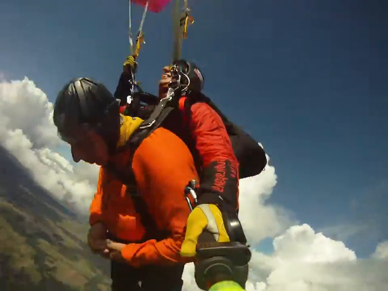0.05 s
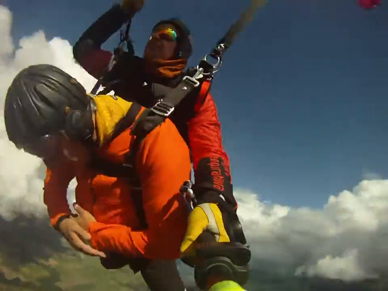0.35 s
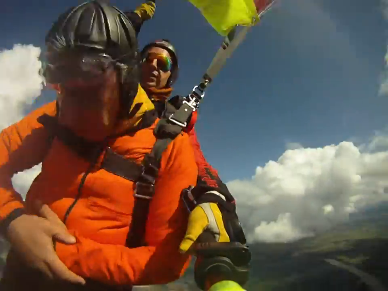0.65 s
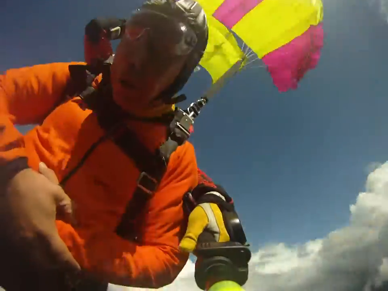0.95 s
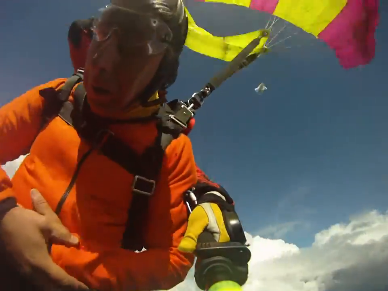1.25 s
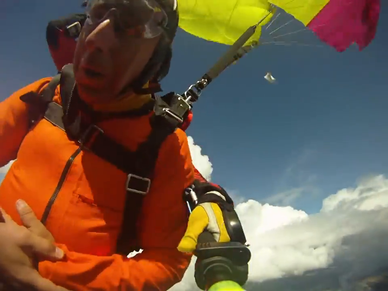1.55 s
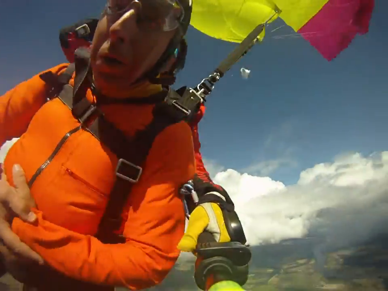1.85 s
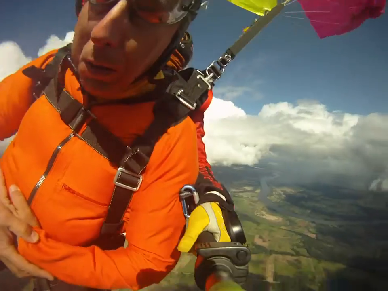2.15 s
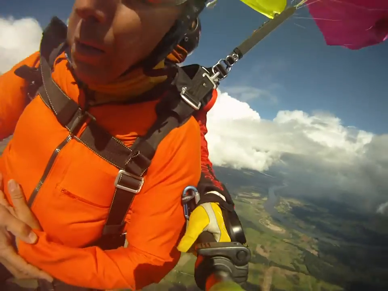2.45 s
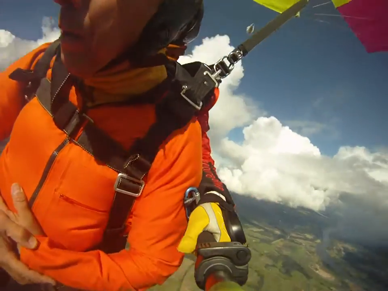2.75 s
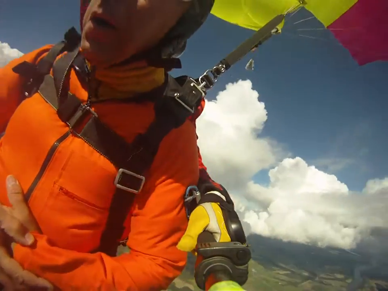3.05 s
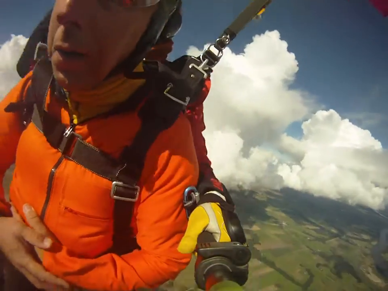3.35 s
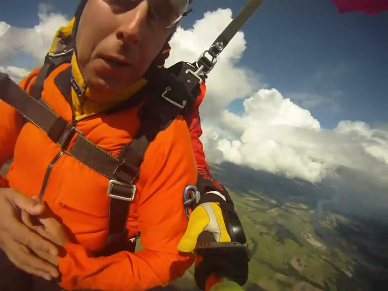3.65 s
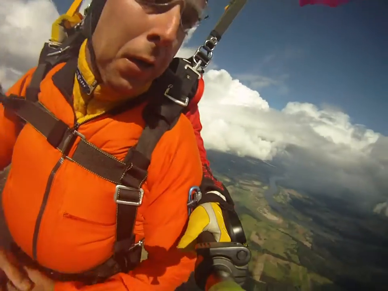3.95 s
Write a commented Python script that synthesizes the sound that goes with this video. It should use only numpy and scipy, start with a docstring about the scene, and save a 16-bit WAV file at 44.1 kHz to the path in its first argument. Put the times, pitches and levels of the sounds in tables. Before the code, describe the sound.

Strong wind rushes and buffets a wrist-worn microphone high in the air. A parachute canopy flutters and cracks as it fills, then settles, and the rush eases to a softer flow with a low, wavering hum.

```python
"""Parachute opening, heard from the wrist

A small camera rides in a closed housing on the jumper's wrist. The canopy flutters and cracks
as it fills, then settles while the air rush slows. Turbulence buffets the housing, which booms
at one low resonance, whistles at an edge and colours the rush. Lines chirp and straps rub.
The camera's 12 kHz sample-and-hold adds a gritty treble."""
import sys
import numpy as np
from scipy import signal
from scipy.fft import rfft, irfft
from scipy.io import wavfile

SR = 44100
rng = np.random.default_rng(int(sys.argv[2]) if len(sys.argv) > 2 else 0)


def file_out(sig):
    """Save sig as 16-bit WAV at sys.argv[1]."""
    # one column per channel
    cols = np.atleast_2d(sig).T
    # limit, then scale
    lim = np.clip(cols, -1, 1)
    pcm = np.round(lim * 32767).astype(np.int16)
    wavfile.write(sys.argv[1], SR, pcm)


N = 176400
TIME_S = np.arange(N) / SR
BINS_HZ = np.arange(N // 2 + 1) * SR / N


def from_db(db):
    """Decibels to gain."""
    return 10 ** (np.asarray(db) / 20)


def unit_rms(x):
    """Scale to unit power."""
    return x / np.sqrt(np.mean(x ** 2) + 1e-20)


def gain_curve(points):
    """Gain per sample from rows of t/s, level/dB."""
    return from_db(np.interp(TIME_S, *np.transpose(points)))


def coloured(x, spectrum, rolloff_db_per_oct=36):
    """Filter by rows of f/Hz, level/dB, rolling off above the last; unit power."""
    hz, db = np.transpose(spectrum)
    octaves = np.log2(np.maximum(BINS_HZ, 1))
    octaves_above = np.maximum(octaves - np.log2(hz[-1]), 0)
    shape_db = np.interp(octaves, np.log2(hz), db) - rolloff_db_per_oct * octaves_above
    return unit_rms(irfft(rfft(x) * from_db(shape_db), N))


def noise(spectrum):
    """Coloured noise; unit power."""
    return coloured(rng.standard_normal(N), spectrum)


def resonance(hz, half_width_hz):
    """Noise ringing in one resonance; unit power."""
    detuning = (BINS_HZ - hz) / half_width_hz
    return unit_rms(irfft(rfft(rng.standard_normal(N)) / (1 + detuning ** 2), N))


def drift(rate_hz):
    """Random wander, mostly below rate_hz; unit power."""
    return resonance(0, rate_hz)


def evened(x, share):
    """Flatten a share of the random swells of narrow-band noise; unit power."""
    swell = np.abs(signal.hilbert(unit_rms(x)))
    return unit_rms(x / (swell ** 2 + .1) ** (share / 2))


def bursts(events, attack_s):
    """Summed envelopes: rise, hold until hold_s after onset, fall 60 dB per decay_s."""
    envelope = np.zeros(N)
    for start_s, db, hold_s, decay_s in events:
        age_s = TIME_S - start_s
        rise = np.clip(age_s / attack_s, 0, 1)
        fall = from_db(-60 * np.clip((age_s - hold_s) / decay_s, 0, 10))
        envelope += from_db(db) * rise * fall
    return envelope


def air_rush():
    """Air tears past the housing, heard through its wall resonances; one rings narrowly."""
    # bright part, set by air speed, and hollow lower part: t/s, relative level/dB
    bright_levels = [(0, -15.5), (.05, -27), (.08, -19.5), (.16, -21), (.22, -17), (.245, -22), (.265, -22),
                     (.47, -22), (.52, -23), (.565, -30), (.59, -18.5), (.65, -23.5), (.71, -21.5),
                     (.78, -25), (.86, -28.5), (.92, -22), (1.04, -32.5), (1.08, -29), (1.3, -30.5),
                     (1.37, -34.5), (1.43, -26), (1.55, -29.5), (2.0, -29.5), (2.13, -28.5), (2.2, -31),
                     (2.24, -36), (2.68, -35), (2.8, -32.5), (2.9, -33.5), (3.15, -32), (3.32, -36),
                     (3.75, -38), (3.9, -40.5)]
    hollow_levels = [(0, -25.5), (.24, -24.5), (.27, -30.5), (.48, -27), (.56, -25.5), (.68, -27),
                     (.8, -29.5), (1.05, -33.5), (1.5, -32), (2.1, -34.5), (2.49, -38.5), (2.81, -35),
                     (3.2, -36.5), (3.8, -37.5), (4, -43)]
    # their spectra: f/Hz, level/dB
    bright_spectrum = [(900, -19), (1550, -11), (1850, 0.5), (2070, 1), (2400, -2.5), (2650, -21.5),
                       (2950, -22.5), (3250, -16.5), (4400, -20.5), (5300, -25), (5900, -27.5)]
    hollow_spectrum = [(200, 4.5), (330, -29), (450, -18), (560, -11.5), (700, -3), (880, -5.5), (1110, 3),
                       (1280, -1.5), (1550, -6), (2200, -42)]
    gain_db, flicker_db, ring_db = -1, .7, -10
    eddies = from_db(flicker_db * drift(rate_hz=24))
    wall_ring = from_db(ring_db) * resonance(hz=3640, half_width_hz=135)
    bright = gain_curve(bright_levels) * (noise(bright_spectrum) + wall_ring)
    hollow = gain_curve(hollow_levels) * noise(hollow_spectrum)
    return from_db(gain_db) * eddies * (bright + hollow)


def edge_whistle():
    """Air across a housing edge gives a faint, breathy whistle."""
    # whistle strength: t/s, level/dB
    levels = [(0, -44), (.22, -34.5), (.36, -53), (.71, -36), (.95, -52), (1.65, -49), (2.1, -40.5),
              (2.44, -47), (2.65, -43), (2.98, -43.5), (3.35, -55)]
    # whistle band: f/Hz, level/dB
    spectrum = [(540, -34), (640, 2), (690, -1), (750, 2.5), (810, -10.5), (920, -43)]
    return gain_curve(levels) * evened(noise(spectrum), share=.5)


def housing_boom():
    """Shed eddies drive the housing's low resonance; the stronger the drone, the steadier it locks."""
    # boom strength: t/s, relative level/dB
    levels = [(0.0, -14), (0.03, -26), (0.05, -48), (0.13, -17), (0.18, -29), (0.2, -18), (0.23, -15),
              (0.29, -40), (0.47, -14.5), (0.49, -34), (0.51, -14.5), (0.58, -34), (0.6, -24), (0.72, -25),
              (0.76, -40), (0.95, -25.5), (1.05, -30), (1.17, -24), (1.38, -24.5), (1.43, -34),
              (1.46, -21.5), (1.65, -21.5), (1.69, -35), (1.74, -18), (1.77, -39), (1.82, -17.5),
              (1.87, -30), (1.89, -18), (1.99, -22.5), (2.02, -30), (2.08, -21.5), (2.22, -35), (2.26, -19),
              (2.31, -43), (2.35, -23), (2.48, -22.5), (2.51, -31), (2.8, -24.5), (2.93, -12.5),
              (3.01, -22.5), (3.14, -25), (3.18, -37), (3.25, -31), (3.32, -44), (3.36, -25), (3.58, -23.5),
              (3.63, -18.5), (3.69, -35.5), (3.72, -25.5), (3.81, -37), (3.91, -28.5), (4.0, -39)]
    # rough skirt around the drone: f/Hz, level/dB
    skirt_spectrum = [(60, -64), (88, 11.5), (115, 11.5), (150, 4), (200, -17.5), (260, -11.5),
                      (400, -25.5)]
    boom_hz, wander_hz, flicker_db = 121.3, 8.8, 1.5
    drone_db, octave_db, skirt_db, lock_db = -2, -24, -28, -19
    envelope = gain_curve(levels)
    drive = envelope / from_db(lock_db)
    unsteadiness = 1 / (1 + drive ** 2)
    pitch_hz = boom_hz + wander_hz * unsteadiness * drift(rate_hz=29.6)
    phase = 2 * np.pi * np.cumsum(pitch_hz) / SR
    drone = unit_rms(np.sin(phase) + from_db(octave_db) * np.sin(2 * phase))
    flicker = from_db(flicker_db * unsteadiness * drift(rate_hz=41))
    skirt = from_db(skirt_db) * drive ** .31 * noise(skirt_spectrum)
    return from_db(drone_db) * envelope * flicker * drone + skirt


def buffeting():
    """Large eddies shove the microphone, hardest while the canopy spreads."""
    # buffet strength: t/s, level/dB
    levels = [(0, -29), (.17, -39), (.26, -46), (.45, -32), (.57, -39), (.71, -33), (.77, -18.5),
              (.86, -29), (.95, -19), (1.03, -16.5), (1.08, -32), (1.17, -19.5), (1.3, -30), (1.49, -30),
              (1.6, -43), (1.72, -23), (1.79, -38), (2.95, -32.5), (3.3, -40), (4, -42)]
    # rumble: f/Hz, level/dB
    spectrum = [(12, -6.5), (30, 5), (42, 3.5), (58, -1.5), (85, -17), (170, -20.5)]
    return gain_curve(levels) * evened(noise(spectrum), share=.8)


def cloth_flutter():
    """Hiss and tiny snapping creases, bunched into quick uneven flaps."""
    # flutter strength: t/s, relative level/dB
    levels = [(0, -33), (.1, -30), (.25, -34.5), (.49, -33), (.57, -37), (.63, -36), (.71, -32), (.77, -39),
              (.82, -34.5), (.89, -33), (.94, -37.5), (1.03, -39.5), (1.15, -37.5), (1.36, -39.5),
              (1.45, -39.5), (1.6, -43), (2.15, -50.5), (2.22, -51), (2.45, -49), (2.62, -54.5), (3.7, -54),
              (4, -57)]
    # cloth rustle: f/Hz, level/dB
    spectrum = [(120, 18.5), (250, 7), (450, -5), (900, -9), (1500, -3), (2200, 2), (2650, 10), (3050, -4),
                (3250, 2.5), (3550, 4.5), (4300, -4.5), (5200, -3), (5900, -11.5)]
    creases_per_s, spread_db, crease_share = 1100, 2.5, .77
    gain_db, flap_db = 11.5, 1.6
    snaps = (rng.random(N) < creases_per_s / SR) * rng.choice([-1, 1], N)
    creases = unit_rms(snaps * from_db(spread_db * np.minimum(rng.exponential(1, N), 4)))
    hiss = rng.standard_normal(N)
    rustle = np.sqrt(crease_share) * creases + np.sqrt(1 - crease_share) * hiss
    flaps = from_db(flap_db * drift(rate_hz=40))
    return from_db(gain_db) * gain_curve(levels) * coloured(rustle * flaps, spectrum)


def canopy_cracks():
    """Panels snap taut."""
    # cracks: t/s, level/dB, hold/s, decay/s
    cracks = [(.0745, -13.5, .005, .03), (.9035, -11, .004, .016), (.9092, -11, .0045, .024),
              (.1386, -18, .004, .03), (.209, -18, .006, .04), (.237, -17, .0071, .02),
              (.4718, -12, .005, .03), (.6205, -22, .002, .019), (.664, -16, .014, .033),
              (.7048, -21.5, .0042, .032), (.9343, -23, .01, .036), (1.1423, -25.5, .019, .04),
              (1.252, -22.5, .0025, .065), (1.311, -21.5, .0018, .025), (1.471, -21.5, .0017, .022),
              (2.135, -27, .0028, .024)]
    # snapping cloth: f/Hz, level/dB
    spectrum = [(150, -16), (450, -13.5), (1100, -9), (1600, -11.5), (2620, 1), (3080, -23), (3550, -2.5),
                (4300, -23), (5300, -15), (5800, -29)]
    return bursts(cracks, attack_s=.0011) * noise(spectrum)


def canopy_thumps():
    """The canopy catches air with dull thumps."""
    # thumps: t/s, level/dB, hold/s, decay/s
    thumps = [(.168, -20, 0.014, 0.029), (.668, -36, 0.0072, 0.042), (.902, -18, 0.011, 0.035),
              (1.465, -29, 0.004, 0.039)]
    # filling canopy: f/Hz, level/dB
    spectrum = [(110, -7), (220, -2.5), (370, -1.5), (470, -14), (560, -19)]
    return bursts(thumps, attack_s=.0032) * evened(noise(spectrum), share=.8)


def rigging_chirps():
    """Lines slip in the rigging and sing for a few milliseconds."""
    # slips: t/s, length/s, f/Hz, level/dB
    slips = [(.2484, 0.0038, 2540, 0), (0.895, .007, 2650, -19)]
    chirps = np.zeros(N)
    for start_s, length_s, hz, db in slips:
        age_s = TIME_S - start_s
        arch = np.sin(np.pi * np.clip(age_s / length_s, 0, 1))
        chirps += from_db(db) * arch * np.sin(2 * np.pi * hz * age_s)
    return chirps


def strap_swishes():
    """Webbing and sleeves slide over the jacket, and a short clink sounds at 2.125 s."""
    # rubs, and one short clink at 2.125 s: t/s, level/dB, hold/s, decay/s
    rubs = [(.33, -30, .05, .06), (.79, -35.5, .06, .08), (1.66, -41, .08, .1), (2.03, -45.5, .025, .05),
            (2.125, -40, .014, .02), (2.35, -46, 0.19, 0.24), (3.2, -51.5, 0.54, .2)]
    # friction hiss: f/Hz, level/dB
    spectrum = [(2500, -7), (4300, -1), (4950, -4), (5300, -1), (5800, -9)]
    return bursts(rubs, attack_s=.013) * noise(spectrum)


def buckle_zip():
    """A strap runs through its buckle with a thin zip."""
    # strap run: t/s, level/dB, hold/s, decay/s
    runs = [(1.18, -38.5, .056, .06)]
    return bursts(runs, attack_s=.013) * resonance(hz=4980, half_width_hz=170)


def gust_howls():
    """Gusts howl in the housing."""
    # gusts: t/s, level/dB, hold/s, decay/s
    gusts = [(2.07, -33, 0.066, 0.23), (2.76, -32, 0.088, 0.46)]
    return bursts(gusts, attack_s=.03) * resonance(hz=2070, half_width_hz=250)


def scene():
    """Wind and gear at one microphone."""
    wind = air_rush() + gust_howls() + edge_whistle() + housing_boom() + buffeting()
    canopy = cloth_flutter() + canopy_cracks() + canopy_thumps()
    harness = rigging_chirps() + strap_swishes() + buckle_zip()
    return (wind + canopy + harness)[None]


def record(dry):
    """The camera samples at 12 kHz, clips and holds each value, mirroring the sound into the treble."""
    clip_level, cutoff_hz = .85, 15300
    sampled_12khz = signal.resample_poly(dry, 40, 147, axis=1, window=("kaiser", 5))
    clipped = np.clip(sampled_12khz, -clip_level, clip_level)
    held_48khz = np.repeat(clipped, 4, axis=1)
    gritty = signal.resample_poly(held_48khz, 147, 160, axis=1)[:, :N]  # back to SR
    lowpass = signal.ellip(12, .1, 90, cutoff_hz, fs=SR, output="sos")
    return signal.sosfilt(lowpass, gritty)


dry = scene()
out = record(dry)
file_out(out)
```